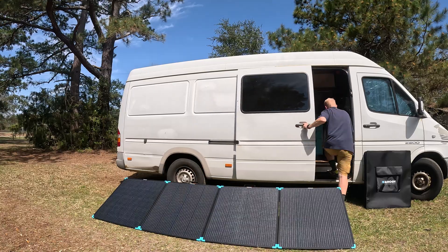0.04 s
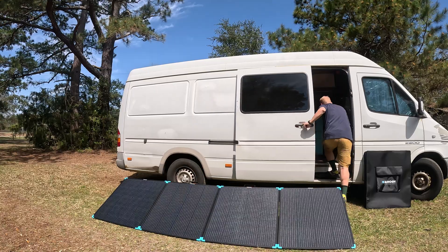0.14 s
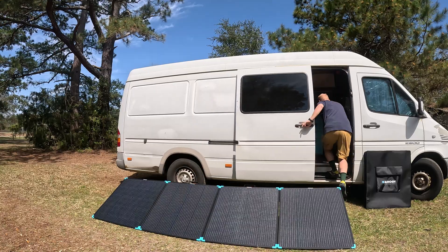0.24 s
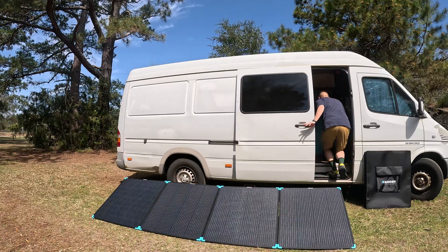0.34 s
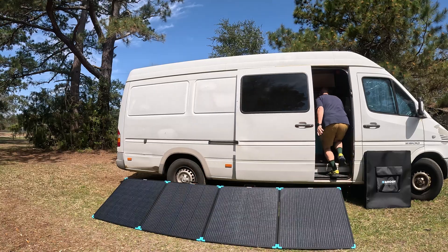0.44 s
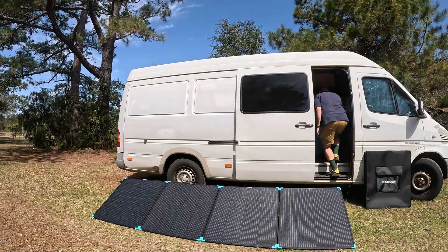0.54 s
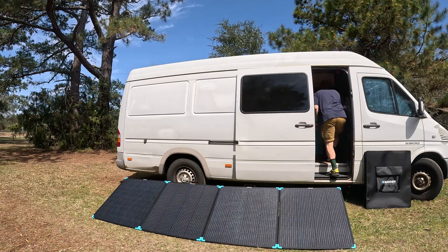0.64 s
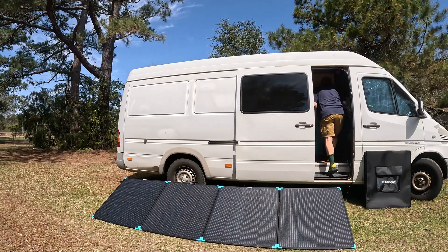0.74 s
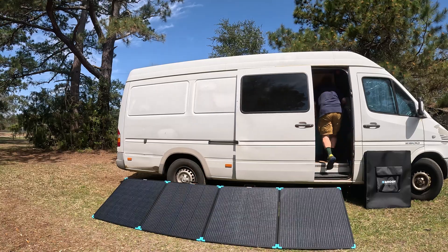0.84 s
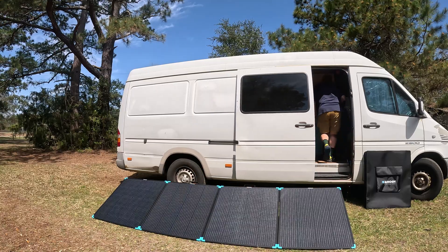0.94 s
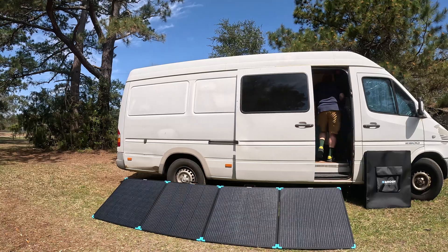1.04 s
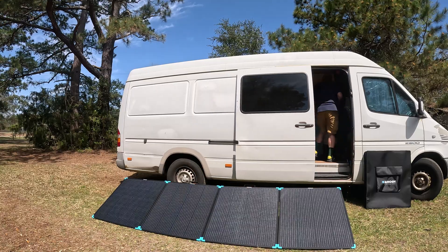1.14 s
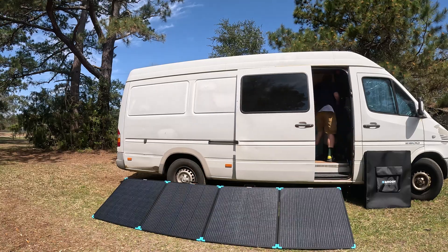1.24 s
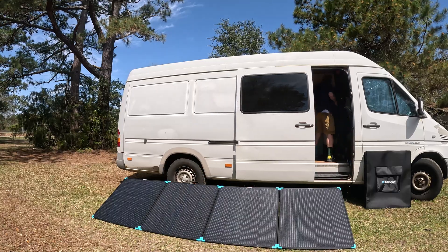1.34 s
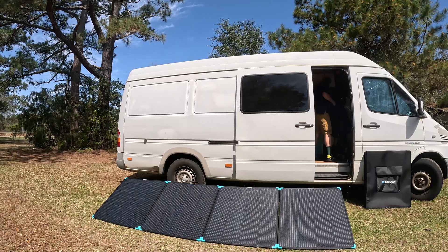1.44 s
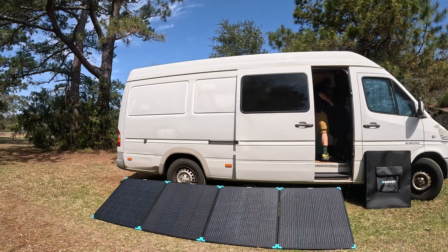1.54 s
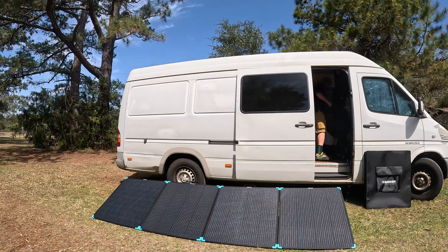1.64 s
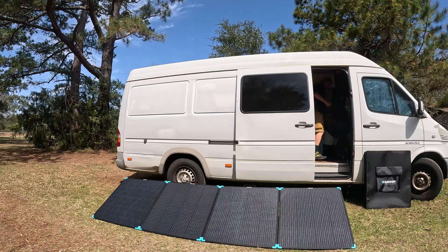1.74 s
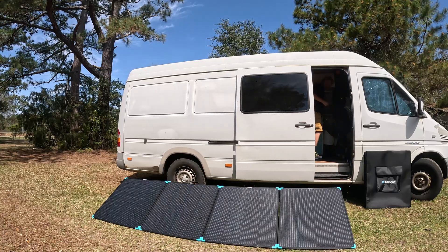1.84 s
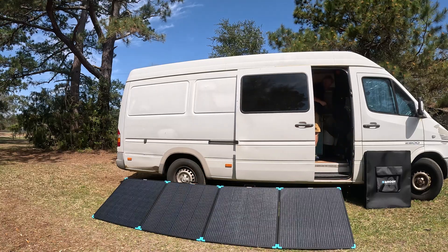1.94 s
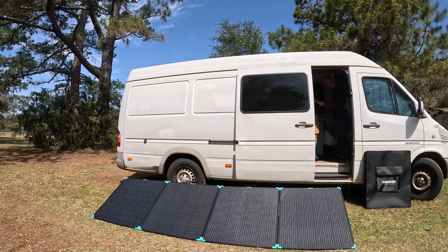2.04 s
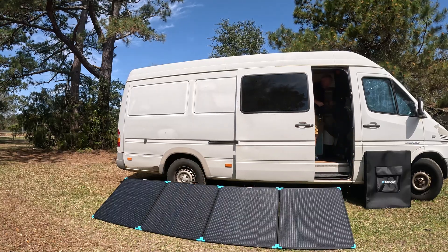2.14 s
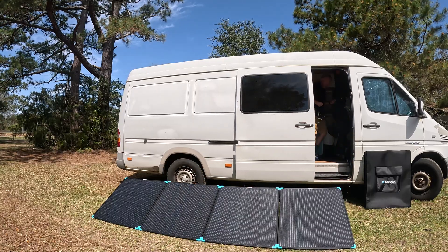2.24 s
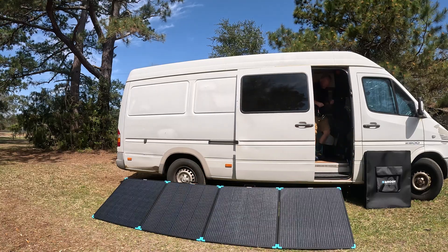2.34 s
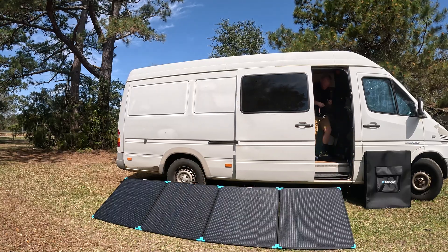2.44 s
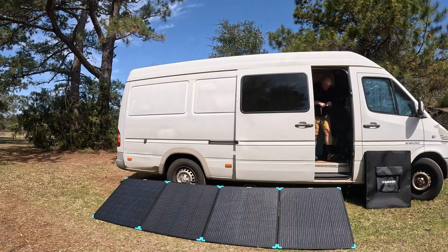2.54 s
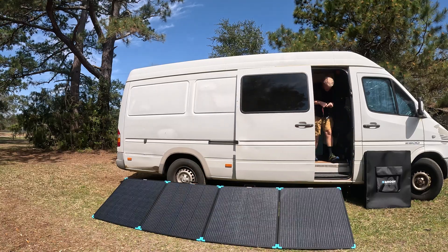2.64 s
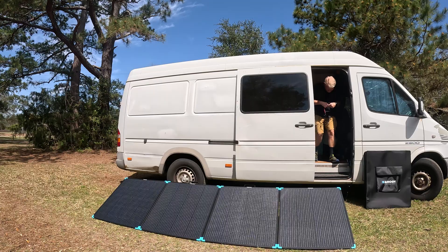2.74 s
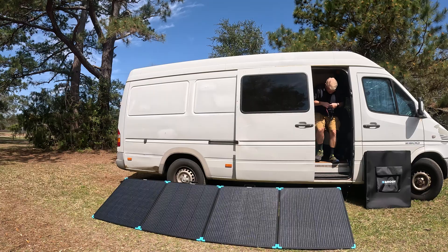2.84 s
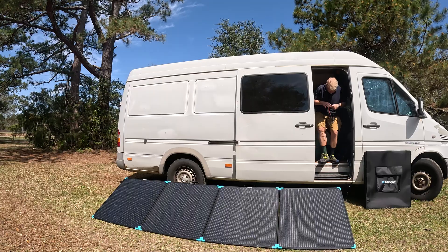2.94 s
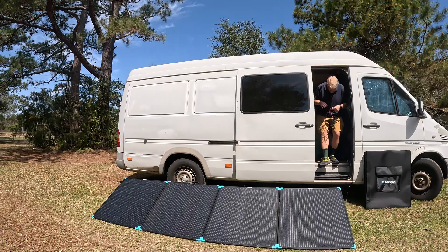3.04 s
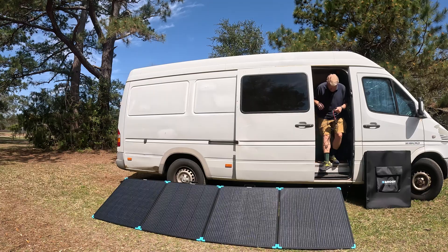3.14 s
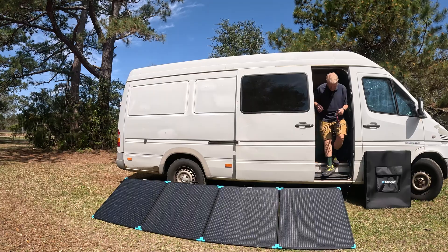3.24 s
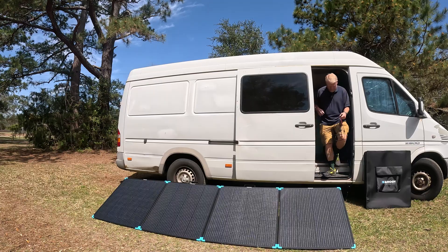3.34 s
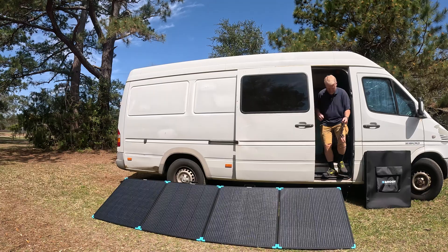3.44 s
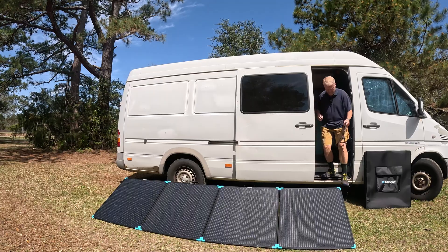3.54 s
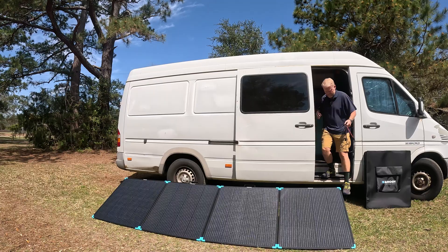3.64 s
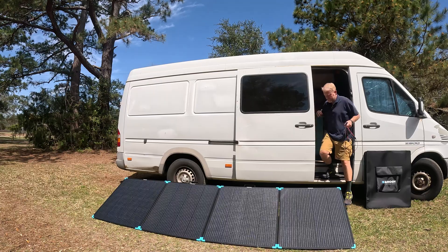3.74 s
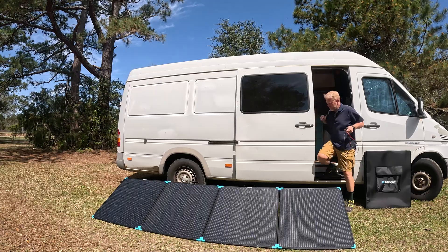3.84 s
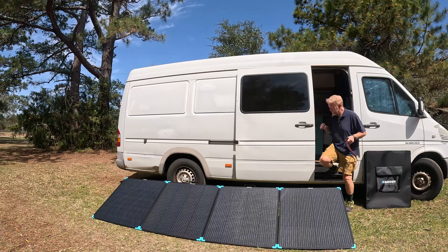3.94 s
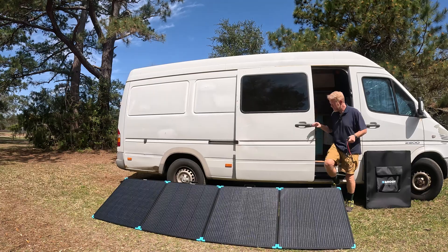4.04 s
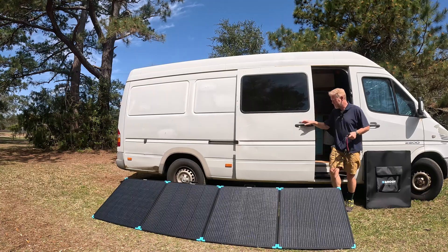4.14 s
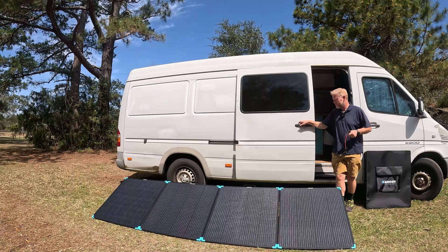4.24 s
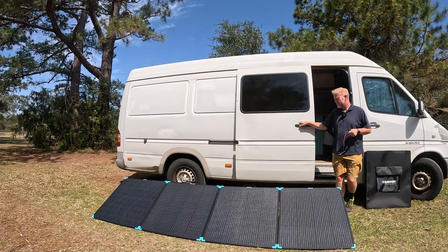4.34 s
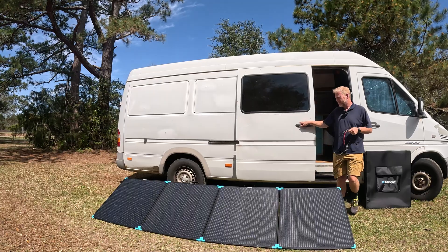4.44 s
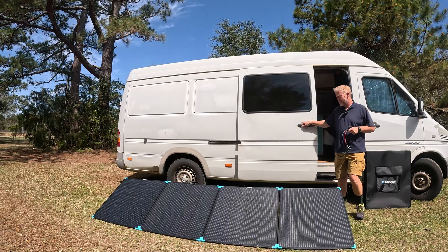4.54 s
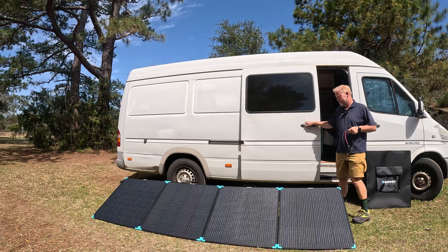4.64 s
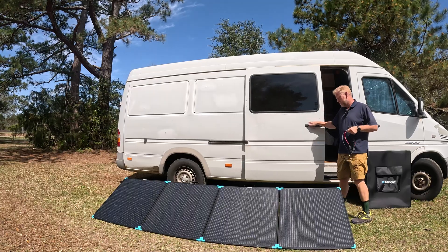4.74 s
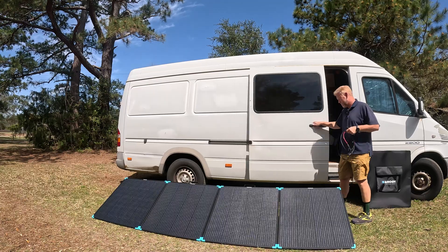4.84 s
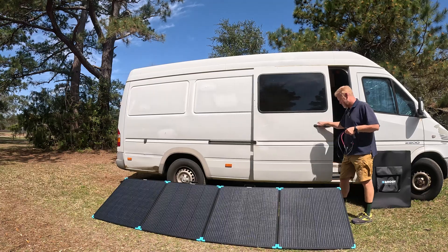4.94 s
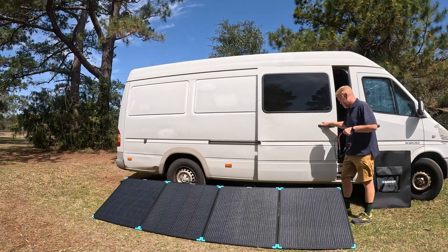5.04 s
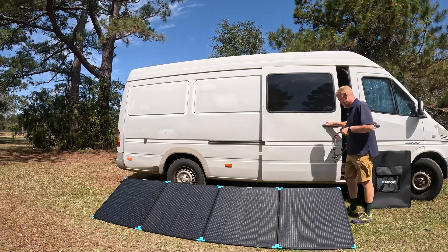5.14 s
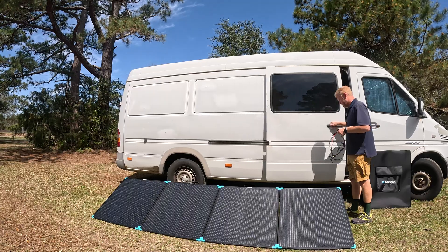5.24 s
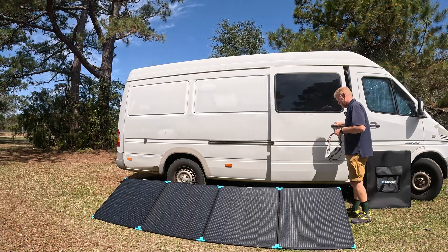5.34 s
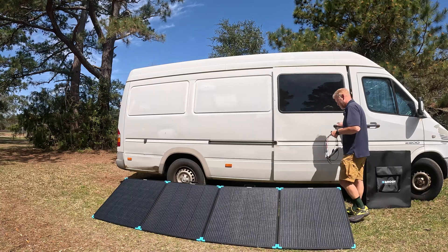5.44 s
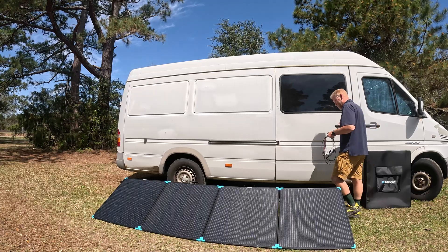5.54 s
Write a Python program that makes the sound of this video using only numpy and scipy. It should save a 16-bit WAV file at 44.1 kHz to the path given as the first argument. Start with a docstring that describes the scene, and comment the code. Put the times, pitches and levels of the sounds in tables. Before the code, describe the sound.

Outdoors beside a cargo van, a man climbs in with soft thumps and rustling clothes. Something knocks and scrapes briefly, keys clink lightly, then heavier footfalls step down and a twig snaps. Finally the metal sliding door rumbles and grinds along its rail, much louder than everything before. Mono, fairly clear, with a faint breeze.

```python
"""A cargo van's sliding door is pulled along: rollers grind and tick in the rail and shake the sheet-metal panels.
Before that a man climbs in (thumps on floor modes), drags something over a hard surface (stick-slip ringing it)
and picks up his keys (bright struck modes). He steps down with rustling clothes (filtered grains), a bird whistles
once (gliding sine) and a twig snaps (very short modes). Behind it all, a faint breeze of filtered noise."""
import sys
import numpy as np
from scipy import signal
from scipy.io import wavfile
from scipy.ndimage import uniform_filter1d

SR = 44100
rng = np.random.default_rng(int(sys.argv[2]) if len(sys.argv) > 2 else 0)


def wrap_up_sound(samples):
    """Save the sound to the file named by the first command line argument, as 16-bit audio."""
    columns = np.atleast_2d(samples).T
    # keep every value between -1 and 1, then stretch to whole-number steps
    tamed = np.clip(columns, -1, 1)
    steps = np.round(tamed * 32767).astype(np.int16)
    wavfile.write(sys.argv[1], SR, steps)


N = 246519
TIME = np.arange(N) / SR
AGE = np.arange(16384) / SR  # seconds since a blow


def amp(db):
    """Decibels to gain."""
    return 10 ** (np.asarray(db) / 20)


def unit(x):
    """Scales to rms 1."""
    return x / np.sqrt(np.mean(x ** 2) + 1e-20)


def struck(x):
    """Scales a blow so that its loudest few milliseconds have rms 1."""
    return x / np.sqrt(uniform_filter1d(x ** 2, size=256).max() + 1e-20)


def wander(samples):
    """Slow random drift of rms 1: noise averaged over the given samples."""
    return unit(uniform_filter1d(rng.standard_normal(N), size=samples))


def level(rows, column=1):
    """Gain over time from a dB column, silent before its first row."""
    rows = np.array(rows)
    gain = amp(np.interp(TIME, rows[:, 0], rows[:, column]))
    return gain * (TIME >= rows[0, 0])


def until(rows):
    """Fades a source out after its last row."""
    return np.exp(-np.maximum(TIME - rows[-1][0], 0) / 0.022)


def strokes(rows):
    """Gain of rubbing strokes that each swell to a peak and fade; their powers add."""
    stroke_range_db = 21.5  # rise within the swell time, fall within the fade time
    power = np.zeros(N)
    for peak_s, db, swell_s, fade_s in rows:
        away = np.maximum((peak_s - TIME) / swell_s, (TIME - peak_s) / fade_s)
        power += amp(db - stroke_range_db * away) ** 2
    return np.sqrt(power)


def add(mix, s, sound):
    """Mixes a sound in at time s."""
    part = mix[max(round(s * SR), 0):][:len(sound)]
    part += sound[:len(part)]


def colour(x, spectrum):
    """Causal minimum-phase filter with the given (Hz, dB) outline."""
    hz, db = np.transpose(spectrum)
    bins_hz = abs(np.fft.fftfreq(8192, 1 / SR))
    log_gain = np.log(amp(np.interp(np.log(bins_hz + 1), np.log(hz), db)))
    taps = np.fft.ifft(np.exp(np.conj(signal.hilbert(log_gain)))).real
    return signal.oaconvolve(x, taps[:len(taps) // 2])[:len(x)]


def band(x, hz, q):
    """One broad resonance."""
    hz = min(hz, SR / 2 - 1000)
    q = max(q, 4 * hz / SR)  # keeps the filter valid at high pitch
    return signal.lfilter(*signal.iirpeak(hz, q, fs=SR), x)


def dying(t60):
    """Falls by 60 dB in t60 seconds."""
    return np.exp(-np.log(1000) * AGE / max(t60, 1e-3))


def burst(t60):
    """Many crowded modes dying together, as decaying noise."""
    return rng.standard_normal(len(AGE)) * dying(t60)


def ring(modes):
    """Damped (Hz, dB, t60 s) modes, each starting up or down at random."""
    out = np.zeros(len(AGE))
    for hz, db, t60 in modes:
        out += amp(db) * rng.choice([-1, 1]) * dying(t60) * np.sin(2 * np.pi * hz * AGE)
    return out


def grains(per_s, spread_db):
    """Tiny random contacts, a few much larger than the rest."""
    size = amp(spread_db * np.minimum(rng.exponential(1, N), 4))
    return unit(size * rng.choice([-1, 1], N) * (rng.random(N) < per_s / SR))


def sounding(force, modes, t60):
    """A shaken body with (Hz, dB) modes of one t60; it radiates little below its lowest mode."""
    sound = signal.oaconvolve(force, ring([(hz, db, t60) for hz, db in modes]))[:N]
    high_pass = signal.butter(4, .8 * modes[0][0], "high", fs=SR, output="sos")
    return unit(signal.sosfilt(high_pass, sound))


def cabin(x):
    """The load space's short, dull tail: low-passed decaying noise that swells in first."""
    tail = signal.lfilter(*signal.butter(1, 5000, fs=SR), burst(0.1) * (1 - dying(0.044)))
    return signal.oaconvolve(x, tail / np.linalg.norm(tail))[:N]


# Door speed, as a rumble level. Each row: time in seconds, level in dB.
DOOR_SPEED = [(4.49, -45), (4.632, -25), (4.866, -16), (5.442, -16.5), (5.528, -18), (5.558, -14),
              (5.58, -36)]
# Door rubbing harder on rail and seal. Each row: peak in seconds, level in dB, swell and fade in seconds.
RUBS = [(5.05, -40.5, 0.8, 0.99), (5.465, -36, .08, 0.05), (5.575, -36, 0.11, 0.033)]
# Outlines of panel rumble, chatter, rail grinding and seal hiss. Each row: frequency in Hz, gain in dB.
PANEL = [(40, -39.5), (105, -17.5), (140, -0.5), (380, -4), (550, -10), (2000, -63)]
CHATTER = [(250, -27), (500, 8.5), (740, 0), (1000, -1.5), (1500, -13), (3000, -64)]
RAIL = [(1000, -6.5), (1800, 2.5), (2110, 1), (2790, 1), (3450, -1.5), (4900, -3.5), (5500, -14),
        (12000, -59)]
SEAL = [(3000, -2.5), (5500, -4.5), (7200, -8), (15500, -26)]
# Modes of the sheet metal. Each row: frequency in Hz, level in dB.
PANEL_MODES = [(92, -17), (148, 0), (191, 2), (241, -4.5), (277, -1), (338, -5), (376, -3.5), (592, -15.5),
               (894, -19)]
FULL_SPEED_DB, PANEL_T60_S, PANEL_RING_DB = -16.5, 0.19, -0.5
PANEL_DB, CHATTER_DB = -17.5, -26.5  # at full speed
RAIL_DB, GRIND_KNEE = -38, 0.55  # grinding ceiling; share of full speed above which it levels off
RAIL_START_S, RAIL_TAKES_S = 4.54, 0.026  # rollers break free and begin to grind
RUB_GRIND_DB = 4.5  # grinding over hiss in a rub
BEND_S, BEND_TAKES_S, SWAY_DB = 5.33, 0.036, -28  # door leans into the track's bend, body sways
SURGE_DB, TICK_DB = 1.3, -1


def door():
    """Rollers on grit ring panels and rail, the seal brushes; rumble and grinding follow speed."""
    speed = level(DOOR_SPEED) / amp(FULL_SPEED_DB)
    rub = strokes(RUBS)
    surge = unit(amp(SURGE_DB * wander(900)))  # the door lurches
    in_bend = (1 + np.tanh((TIME - BEND_S) / BEND_TAKES_S)) / 2
    rolling = np.clip((TIME - RAIL_START_S) / RAIL_TAKES_S, 0, 1)
    bumps = grains(per_s=1200, spread_db=2.0)
    grit = grains(per_s=1500, spread_db=2.8)

    panel_ring = sounding(grains(per_s=300, spread_db=1), PANEL_MODES, PANEL_T60_S)
    rumble = unit(unit(colour(bumps, PANEL)) + amp(PANEL_RING_DB) * panel_ring)
    chatter = unit(colour(bumps + cabin(bumps) / 2 + rng.standard_normal(N) / 2, CHATTER))
    sway = unit(signal.sosfilt(signal.butter(2, [78, 112], "band", fs=SR, output="sos"), bumps))
    scour = unit(colour(grit + cabin(grit) + rng.standard_normal(N) / 2, RAIL))
    ticks = unit(colour(roller_ticks(), RAIL))
    grind = unit(scour + amp(TICK_DB) * ticks)
    hiss = unit(colour(grit + rng.standard_normal(N), SEAL))

    body = rumble * amp(PANEL_DB) + chatter * amp(CHATTER_DB) + sway * in_bend * amp(SWAY_DB)
    grind_gain = np.hypot(amp(RAIL_DB) * np.tanh(speed / GRIND_KNEE), amp(RUB_GRIND_DB) * rub)
    return surge * (speed * body + grind * rolling * grind_gain + hiss * rub)


# Rail resonances in Hz.
ROLLER_HZ = [2110, 2800, 4600]
TICKS_PER_S, TICK_T60_S = 30, .018  # rate of each of four tick trains


def roller_ticks():
    """Loose rollers rattle: each tick is a tiny rough crack coloured by the rail's resonances."""
    cracks = np.zeros(N)
    for _ in range(4):
        cracks += signal.oaconvolve(grains(TICKS_PER_S, spread_db=3), burst(TICK_T60_S))[:N]
    return unit(sum(band(cracks, hz, q=6) for hz in ROLLER_HZ))


# Roller clicks over rail flaws. Each row: start in seconds, level in dB, centre in Hz.
CLICKS = [(4.597, -31.5, 2100), (4.7215, -35, 2080), (4.846, -28.5, 2000), (5.011, -28.5, 3730),
          (5.06, -27, 2740), (5.071, -30, 3900), (5.098, -25.5, 1980), (5.335, -26, 3380),
          (5.3847, -28, 4430), (5.52, -31, 2330), (5.555, -28.5, 1610)]
# Jolts that make the panel boom. Each row: start in seconds, level in dB, centre in Hz.
BOOMS = [(4.865, -18, 366), (5.01, -14, 157), (5.055, -13.5, 200), (5.3857, -15.5, 233), (5.41, -13.5, 243),
         (5.554, -12.5, 374), (5.56, -19, 670)]


def jolts():
    """A roller clicks over a flaw in the rail; the harder jolts make the panel boom."""
    out = np.zeros(N)
    for s, db, hz in CLICKS:
        click = band(band(burst(t60=0.042), hz, q=4.6), hz, q=0.55)
        add(out, s, amp(db) * struck(click))
    for s, db, hz in BOOMS:
        boom = band(band(burst(t60=0.14), hz, q=3.4), hz, q=1.95)
        add(out, s, amp(db) * struck(boom))
    return out


# Feet and knees on the van floor. Each row: start in seconds, level in dB, thump pitch in Hz.
STEPS = [(.004, -34.5, 264), (0.027, -30.5, 84.5), (0.056, -30.5, 269), (.085, -31.5, 116.5),
         (0.716, -41.5, 284), (1.292, -37, 117), (1.622, -45, 320), (2.709, -40, 108.5), (2.93, -35.5, 95),
         (3.286, -27.5, 180), (3.317, -26, 149), (3.347, -25.5, 370), (3.372, -26, 138.7),
         (3.711, -26, 249.7), (3.862, -35, 208), (4.015, -25.5, 136.3), (4.401, -31, 152)]
# Modes of the floor. Each row: frequency in Hz, level in dB, t60 in seconds.
FLOOR_MODES = [(90.5, -8, 0.36), (137, -1, 0.35), (207.6, -4.5, 0.37), (376, -7, 0.26)]
# Outline of the thud. Each row: frequency in Hz, gain in dB.
THUD = [(50, -15), (150, -1), (550, -3.5), (3500, -58)]
THUMP_GLIDE, THUMP_GLIDE_T60_S = .9, .045  # pitch starts this share higher, then sinks
THUMP_CYCLES, THUMP_ROUGH = 24, .55  # cycles per t60; unevenness of swing and phase
HEEL_HZ, THUD_DB, THUD_DB_PER_OCTAVE = 220, -2, 6  # thud level at heel pitch, and its slope


def steps():
    """Quick bending waves come first, so the thump sinks in pitch; higher, harder blows add more thud."""
    out = np.zeros(N)
    for s, db, hz in STEPS:
        turns = np.cumsum(hz * (1 + THUMP_GLIDE * dying(THUMP_GLIDE_T60_S))) / SR
        swing, slip = unit(uniform_filter1d(rng.standard_normal((2, len(AGE))), size=300))
        onset = 1 - dying(t60=.015)
        t60 = THUMP_CYCLES / hz
        tone = np.sin(2 * np.pi * turns + THUMP_ROUGH * slip)
        thump = (1 + THUMP_ROUGH * swing) * tone * dying(t60) * onset
        thud_gain = amp(THUD_DB + THUD_DB_PER_OCTAVE * np.log2(hz / HEEL_HZ))
        thud = thud_gain * struck(colour(burst(t60) * onset, THUD))
        floor = amp(-9) * struck(ring(FLOOR_MODES) * onset)
        add(out, s, amp(db) * struck(struck(thump) + floor + thud))
    return signal.sosfilt(signal.butter(2, 70, "high", fs=SR, output="sos"), out)


# Short knocks, clicks, a scuff and a creak. Each row: start in seconds, level in dB, centre in Hz, t60 in seconds.
KNOCKS = [(0.088, -36.5, 1900, 0.046), (0.714, -41, 1170, 0.47), (1.291, -35, 574, 0.033),
          (1.659, -27.5, 614, 0.076), (1.6582, -38, 4400, 0.051), (1.6731, -30.5, 990, 0.075),
          (1.812, -31.5, 4260, 0.032), (1.873, -36.5, 3420, 0.075), (2.087, -44.5, 372, 0.82),
          (3.285, -45, 1860, .018), (3.351, -40.5, 2970, 0.049), (3.408, -24.5, 2440, 0.049),
          (3.411, -26.5, 860, 0.06), (3.709, -41, 990, 0.028)]


def knocks():
    """Short knocks, clicks, a scuff and a creak, each decaying noise through one resonance and a band-pass."""
    out = np.zeros(N)
    for s, db, hz, t60 in KNOCKS:
        knock = band(burst(t60), hz, q=1.77)
        band_pass = signal.butter(2, [450, min(5 * hz, 7500)], "band", fs=SR)
        add(out, s, amp(db) * struck(signal.lfilter(*band_pass, knock)))
    return out


# Push of the dragged thing. Each row: time in seconds, level in dB.
DRAG = [(1.695, -33.5), (1.74, -32.5), (1.757, -28.5), (1.79, -28.5), (1.828, -43), (1.859, -61)]
# Modes of the surface under it. Each row: frequency in Hz, level in dB.
SURFACE_MODES = [(560, 2), (790, 0), (1040, 2.5), (2050, -0.5), (3900, 2)]
# Outline of the scrape. Each row: frequency in Hz, gain in dB.
SCRAPE = [(280, -24), (560, 2.5), (1300, 1), (4500, -0.5), (15500, -21)]
SLIPS_PER_S, SURFACE_T60_S, SURFACE_DB = 150, 0.045, -1.5  # slip rate is the median
SURFACE_DRIFT = .02  # rms share by which the ring shifts in pitch


def drag():
    """Uneven stick-slip over grit rings the surface; the ring shifts as the contact moves."""
    slips = np.cumsum(SLIPS_PER_S * np.exp(0.34 * wander(200))) / SR
    force = grains(per_s=5000, spread_db=2.5) * np.exp(-(slips % 1))
    ringing = sounding(force, SURFACE_MODES, SURFACE_T60_S)
    surface = np.interp(TIME + np.cumsum(SURFACE_DRIFT * wander(2000)) / SR, TIME, ringing)
    push = level(DRAG)
    grit = unit(colour(force, SCRAPE)) * np.sqrt(push / push.max())  # harder push, more grit
    return (grit + amp(SURFACE_DB) * surface) / np.sqrt(2) * push * until(DRAG)


# Keys striking each other. Each row: start in seconds, level in dB, brightness in Hz, t60 in seconds.
JINGLES = [(1.875, -45.5, 12000, 0.052), (1.938, -42, 12800, 0.078), (2.171, -40.5, 8850, .05),
           (2.193, -38, 6950, 0.058), (2.21, -40, 7500, .03), (2.225, -32, 7640, 0.012),
           (2.238, -42.5, 11800, 0.038), (2.275, -38.5, 10000, 0.037), (2.355, -52.5, 9400, 0.049),
           (2.424, -48, 5750, 0.023), (2.617, -40, 7540, 0.05), (2.629, -38.5, 4500, .02),
           (2.664, -41, 5430, 0.016)]


def keys():
    """Each touch of the keys is followed by a small rebound."""
    out = np.zeros(N)
    for s, db, hz, t60 in JINGLES:
        add(out, s, amp(db) * clink(hz, t60))
        rebound_s = s + rng.uniform(.006, .02)
        add(out, rebound_s, amp(db - 12) * clink(hz, t60))
    return out


# Modes of a key. Each row: frequency in Hz, level in dB.
KEY_MODES = [(3580, 11), (6850, 6.5), (9200, 6), (11850, 3), (14700, 8)]
KEY_RING = 1.74  # ring t60 over scrape t60


def clink(hz, t60):
    """A bright scrape and the ring of three random keys: held keys click, free ones ring on."""
    metal = np.zeros(len(AGE))
    for size in rng.uniform(.92, 1.08, 3):
        metal += ring([(f * size, db + rng.normal(0, 4), KEY_RING * t60) for f, db in KEY_MODES])
    touch = (struck(burst(t60)) + struck(metal)) * (1 - dying(t60=.006))
    return struck(band(band(touch, hz, q=1), hz, q=1))


# Cloth rustles, some short, some broad overlapping swells.
# Each row: peak in seconds, level in dB, swell and fade in seconds.
RUSTLES = [(.06, -43, 0.57, 0.14), (.53, -49.5, 1.56, 0.5), (.595, -39, 0.064, 0.022), (.92, -50, 1, 0.99),
           (1.51, -50.5, 0.23, 0.077), (2.17, -46, 0.65, 0.34), (2.68, -41, 0.15, 0.25),
           (2.94, -42.5, 0.68, 0.21), (3.135, -46, 0.17, 0.056), (3.37, -49.5, 0.35, 0.94),
           (3.89, -42.5, 0.16, 0.32), (4.345, -44, 0.28, 0.13), (4.57, -55.5, 0.5, 0.19)]
# Weight shifting on the soles. Each row: peak in seconds, level in dB, swell and fade in seconds.
SHUFFLES = [(.12, -45.5, 1, 0.6), (.507, -42, 0.04, 0.033), (.74, -43, 0.06, 0.16),
            (1.49, -45, 0.15, 0.068), (2.7, -39.5, 0.14, 0.15), (2.95, -49, 0.54, 1.4),
            (3.93, -43, 0.48, 0.4), (4.34, -43.5, 0.51, 0.83)]
# Outlines of cloth and soles. Each row: frequency in Hz, gain in dB.
CLOTH = [(300, 11.5), (800, 10.5), (1700, 6.5), (4800, 5.5), (9000, -4.5), (15500, -17)]
SOLES = [(40, 6), (110, 18.5), (330, 13), (800, 8.5), (2200, -13), (5000, -35)]
CATCH_DB = 1.5  # cloth catches and slips, so its level is uneven


def movement():
    """Cloth rubs in fine grains; soles scuff and load the floor."""
    catching = amp(CATCH_DB * wander(900))
    cloth = unit(colour(grains(per_s=9000, spread_db=1.0), CLOTH) * catching)
    soles = unit(colour(grains(per_s=1600, spread_db=3.5), SOLES))
    return cloth * strokes(RUSTLES) + soles * strokes(SHUFFLES)


# Modes of the twig. Each row: frequency in Hz, level in dB, t60 in seconds.
TWIG_MODES = [(1160, -11.5, 0.0086), (2350, -8.5, 0.0078), (3600, -1, 0.0065), (4900, -2, 0.0039)]
TWIG_S, TWIG_DB = 3.9295, -20


def twig():
    """One dry crack underfoot that dies within a few milliseconds."""
    out = np.zeros(N)
    crack = signal.lfilter(*signal.butter(2, [1000, 6000], "band", fs=SR), burst(t60=.005))
    snap = struck(ring(TWIG_MODES)) + amp(-6) * struck(crack)
    add(out, TWIG_S, amp(TWIG_DB) * struck(snap * (1 - dying(t60=.002))))
    return out


# One rising whistle. Each row: time in seconds, pitch in Hz, level in dB.
WHISTLE = [(3.72, 3270, -68), (3.84, 3330, -54), (3.89, 3440, -59), (3.995, 3590, -56)]


def bird():
    """A thin whistle: one sine that slides upward."""
    s, hz, _ = np.transpose(WHISTLE)
    turns = np.cumsum(np.interp(TIME, s, hz)) / SR
    return unit(np.sin(2 * np.pi * turns)) * level(WHISTLE, 2) * until(WHISTLE)


# Outline of the breeze. Each row: frequency in Hz, gain in dB.
AIR = [(25, -13), (280, 9), (900, 3.5), (1600, -8), (5500, -45)]
AIR_DB = -58.5


def air():
    """Faint steady wash of breeze in the trees, as filtered noise."""
    return amp(AIR_DB) * unit(colour(rng.standard_normal(N), AIR))


def scene():
    """The door, the man in the van with its cabin tail, and the open air."""
    inside = steps() + knocks() + drag() + keys()
    inside = inside + amp(-15) * cabin(inside)
    return (door() + jolts() + inside + movement() + twig() + bird() + air())[None]


EDGE_HZ = 15850


def record(dry):
    """Band limit: a steep linear-phase low-pass."""
    low_pass = signal.firwin(511, EDGE_HZ, window=("kaiser", 9), fs=SR)
    return signal.oaconvolve(dry, low_pass[None], "same")


dry = scene()
out = record(dry)
wrap_up_sound(out)
```